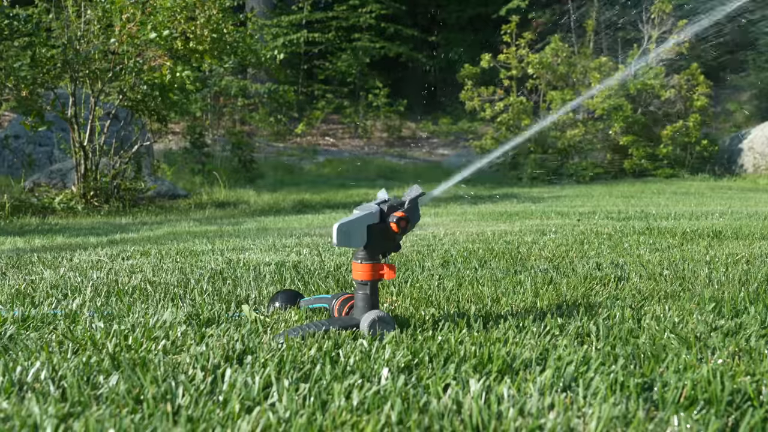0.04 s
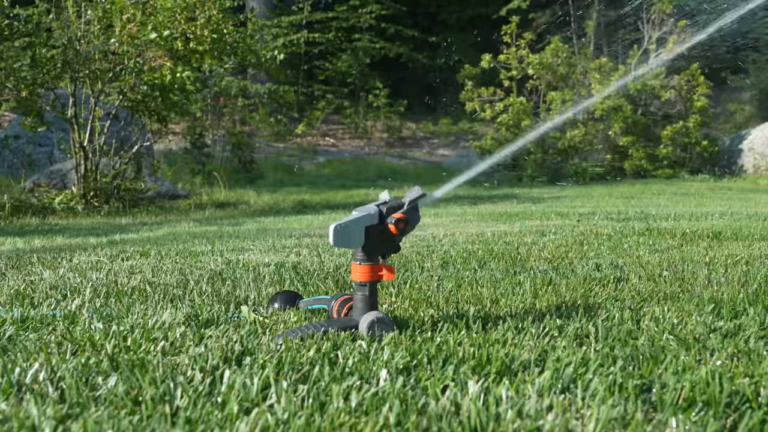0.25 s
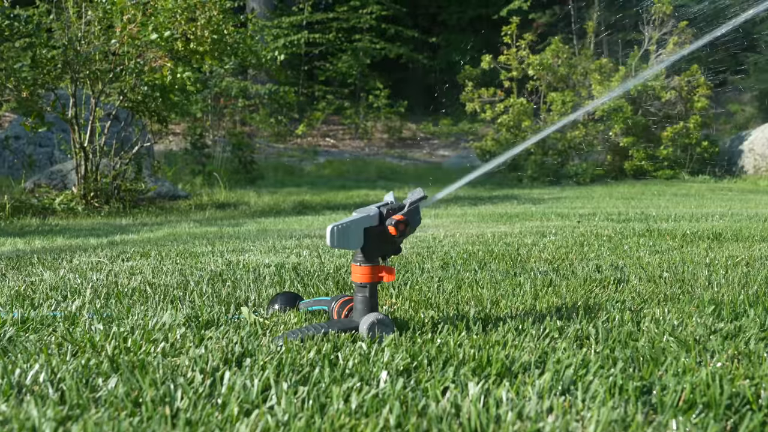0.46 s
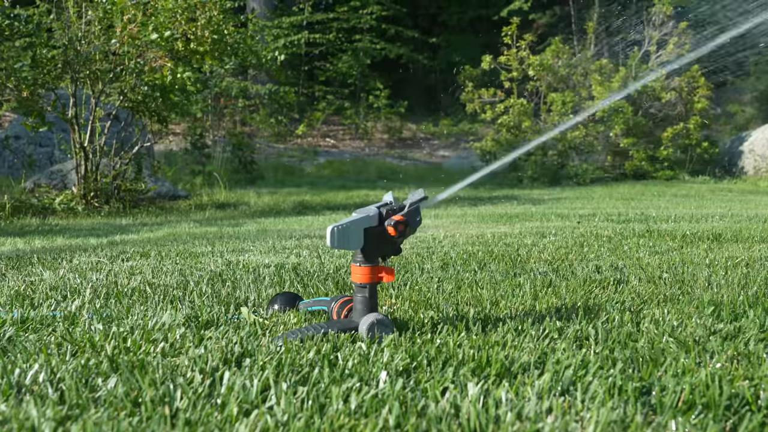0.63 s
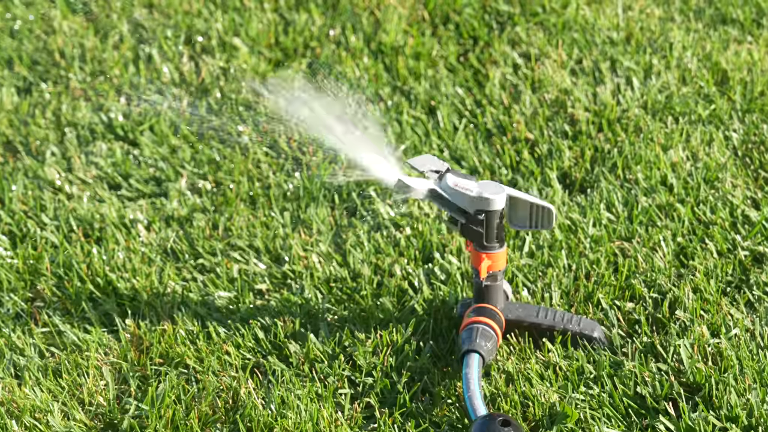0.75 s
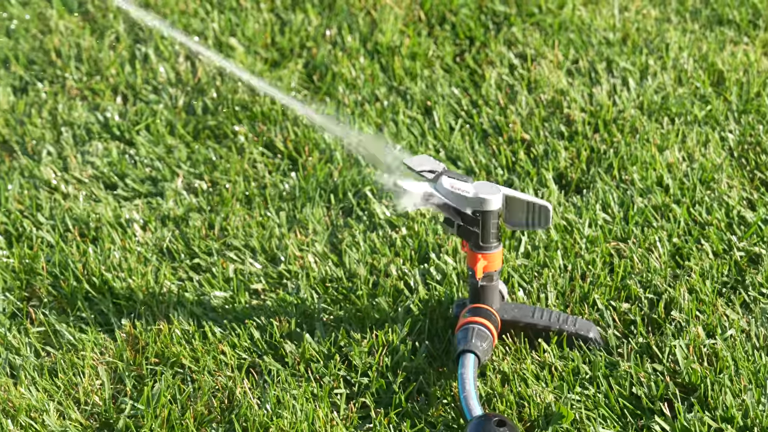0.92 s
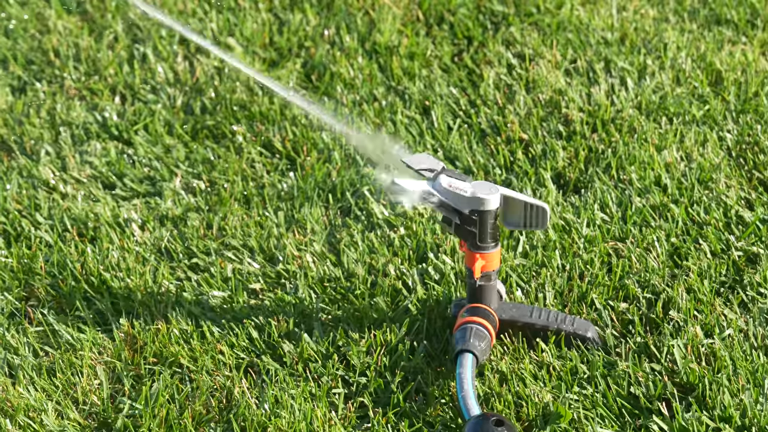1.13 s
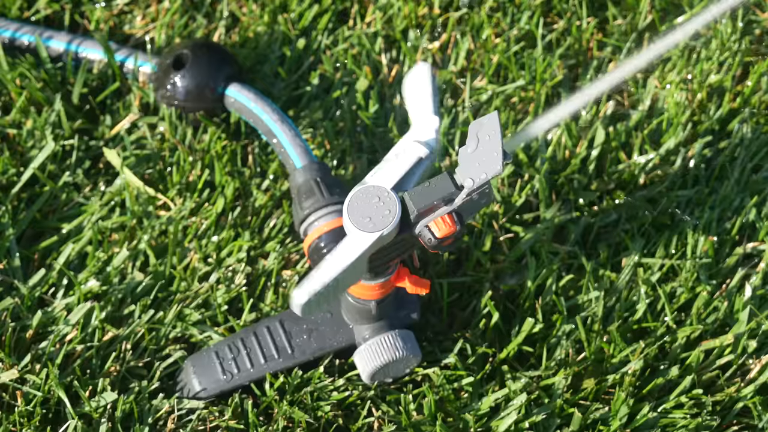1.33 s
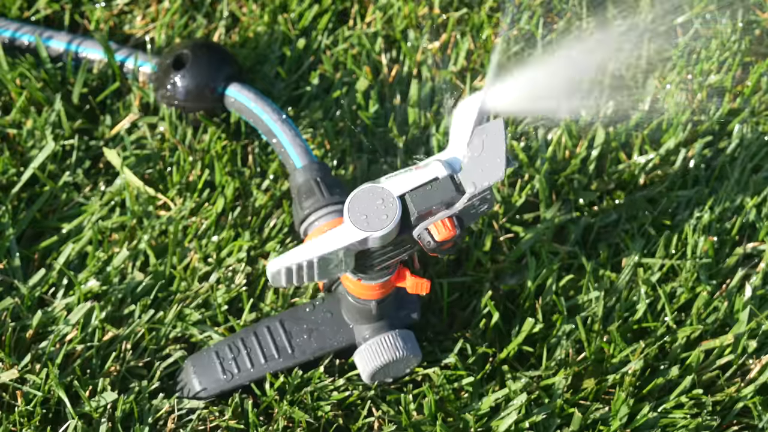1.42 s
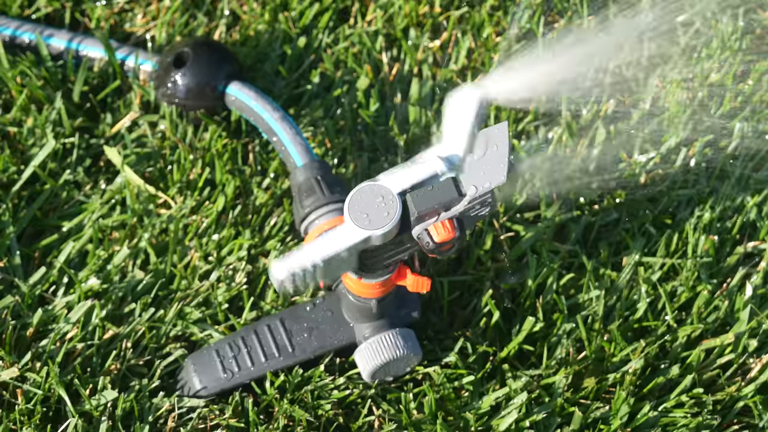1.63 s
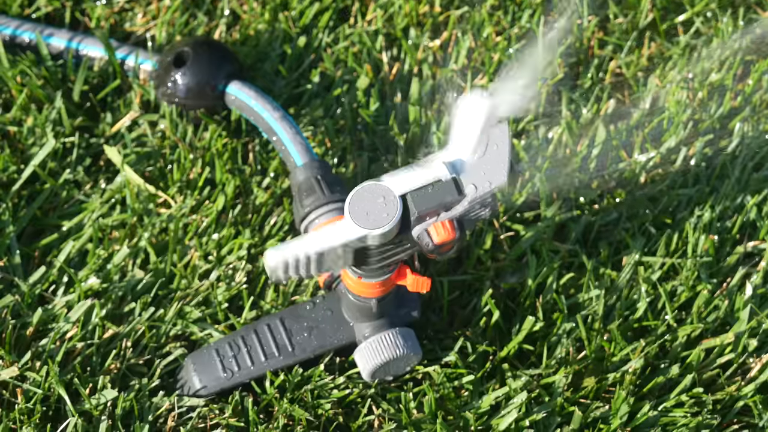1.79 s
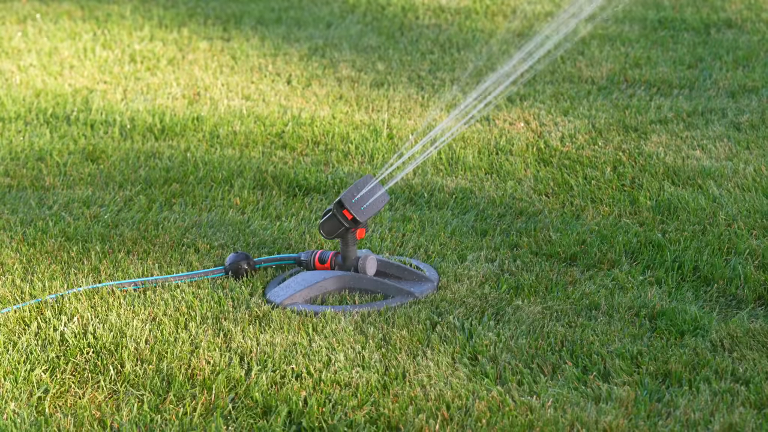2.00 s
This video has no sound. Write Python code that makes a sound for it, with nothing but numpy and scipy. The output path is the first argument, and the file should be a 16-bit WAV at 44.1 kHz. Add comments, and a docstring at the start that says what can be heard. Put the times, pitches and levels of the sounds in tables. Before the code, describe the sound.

A lawn sprinkler pulses outdoors with sharp, regular ticks and short splashes of spray.

```python
"""A nozzle hisses over a distant rumble: an impact sprinkler on a lawn.
Five times a second its sprung arm swings into the jet: water rings in the scoop, the arm knocks on
the head, and the jet shatters into spray until the arm swings clear. Faint whistles fall between strokes.
Heard from three nearby positions in turn, then briefly from a fourth."""
import sys
import numpy as np
from scipy.fft import rfft, irfft, next_fast_len
from scipy.io import wavfile
from scipy.ndimage import map_coordinates

SR = 44100
rng = np.random.default_rng(int(sys.argv[2]) if len(sys.argv) > 2 else 0)


def wrap_up_sound(samples):
    """Save the sound to the file named by the first command line argument, as 16-bit audio."""
    columns = np.atleast_2d(samples).T
    # keep every value between -1 and 1, then stretch to whole-number steps
    tamed = np.clip(columns, -1, 1)
    steps = np.round(tamed * 32767).astype(np.int16)
    wavfile.write(sys.argv[1], SR, steps)


N = 90537

# changes of listening position (time [s])
MOVES_S = [.705, 1.325, 1.996]
# free jet (frequency [Hz], level [dB])
JET_SPECTRUM = [(1500, -3.5), (2800, -.5), (3800, -4), (5000, 1.5), (7500, -4.5), (9500, -4), (11300, -5),
                (13000, 0), (15500, -3)]
# nozzle resonance, per position (frequency [Hz], half width [Hz], lift [dB])
NOZZLE_PEAKS = [(6400, 320, 10.5), (6160, 180, 7.5), (2280, 130, 6), (4240, 5400, 4)]
# jet, per position (level [dB])
JET_LEVELS_DB = [-49, -52, -49.5, -43]
# distant rumble (frequency [Hz], level [dB])
RUMBLE_SPECTRUM = [(32, -19), (50, -10.5), (80, -1), (115, 1), (150, -2.5), (210, -2.5), (330, -10.5),
                   (550, -10), (900, -20.5), (1500, -22)]
# swell of rumble and hum (time [s], gain [dB])
SWELL = [(.17, 0.5), (.3, 0.5), (1.2, -0.5), (1.28, -1), (1.5, -0.5)]
# open-air rush (frequency [Hz], level [dB])
RUSH_SPECTRUM = [(160, -4.5), (220, 3.5), (400, -3.5), (800, -0.5), (1200, -5), (2000, -29)]
# rush, per position (level [dB])
RUSH_LEVELS_DB = [-62.5, -53, -55.5, -50]
# deeper rumble at the last position (frequency [Hz], level [dB])
DEEP_SPECTRUM = [(25, -5), (55, -11), (90, -1), (200, -24)]
# arm strokes, per position (jet contact [s], knock time [s], length [s], scoop gain [dB],
# scoop ring [Hz], spray gain [dB], knock gain [dB])
ARM_STROKES = [
    [(.143, .162, 0.065, -35, 4660, -27.5, -24), (.337, .356, 0.065, -34, 4560, -27.5, -22.5),
     (.531, .549, 0.063, -32.5, 4530, -26, -22)],
    [(.763, .779, 0.059, -29, 4390, -30.5, -24), (.961, .978, 0.06, -30, 4420, -30, -22.5),
     (1.159, 1.178, 0.062, -31, 4500, -30.5, -22.5)],
    [(1.411, 1.427, 0.054, -30.5, 5170, -25.5, -25.5), (1.622, 1.638, 0.054, -28, 4650, -25, -25),
     (1.831, 1.847, 0.054, -29, 5160, -24.5, -21)],
]
# shattered jet, per position (frequency [Hz], level [dB])
SPRAY_SPECTRA = [
    [(1300, -18.5), (2000, -7), (2300, 3.5), (3500, -7), (4400, 6.5), (5900, -10.5), (7000, 5.5),
     (8000, -2), (10000, 3), (15500, -2)],
    [(1100, -17.5), (1850, -10), (2500, -1), (4500, 9.5), (6300, 6.5), (8300, 0.5), (11000, 7.5),
     (15500, 3)],
    [(1100, -14), (1700, -11), (2200, 0), (2800, -6), (3400, 3.5), (5000, -3.5), (7500, 1), (15500, 2)],
]
# spray envelope, per position (rise [s], sag [dB], tail [dB])
SPRAY_ENVELOPES = [(0.027, 1, -31), (0.014, 3.5, -18.5), (.018, 2.5, -17.5)]
# coarse drops, per position (level re spray [dB])
SPIT_LEVELS_DB = [-18, -6.5, -10]
# head resonances, per position (frequency [Hz], half width [Hz], lift [dB])
HEAD_PEAKS = [
    [(2800, 200, 7), (5120, 56, 10.5), (7260, 50, 4), (13900, 90, 8), (15530, 110, 11)],
    [(1453, 210, 16.5), (2150, 103, 12), (2920, 250, 4.5), (9500, 97, 9)],
    [(3980, 95, 6), (5130, 200, 12.5), (6410, 170, 8), (6860, 110, 9), (7920, 64, 7)],
]
# hollow of the scoop, per position (frequency [Hz], level [dB])
SCOOP_SPECTRA = [
    [(2000, -13), (3600, -12), (4500, 1), (5300, -1.5), (7500, -17), (15000, -12)],
    [(3700, -20), (4300, 2.5), (6300, 3.5), (7500, -12.5), (11000, -9.5), (15000, -22)],
    [(3600, -21), (4300, 5.5), (6400, -4), (7500, 0), (15000, -21)],
]
# water splats in the scoop and the arm's second clacks (time [s], length [s], frequency [Hz], level [dB])
BRIEF_RINGS = [(0.158, .008, 4550, -31.5), (.201, 0.0064, 2890, -33), (0.366, .008, 4310, -31),
               (0.586, .009, 2326, -30), (0.772, .008, 6300, -32), (.986, 0.0061, 4550, -27),
               (1.181, .006, 4130, -30), (1.423, 0.0051, 5200, -26.5), (1.431, 0.0167, 4176, -25),
               (1.635, 0.0078, 6210, -24.5), (1.642, 0.0084, 4440, -25), (1.667, .008, 3270, -30.5),
               (1.840, .005, 5080, -26.5)]
# knock mode, per position (frequency [Hz], t60 [s])
KNOCK_MODES = [(2380, 0.027), (3085, 0.015), (2306, 0.019)]
# dull slap as the arm leaves the jet (frequency [Hz], level [dB])
SLAP_SPECTRUM = [(1300, -29), (2200, -7.5), (3300, 1), (5000, -10.5)]
# jet whistles (time [s], length [s], start frequency [Hz], level [dB])
WHISTLE_EVENTS = [(1.245, 0.029, 2920, -53.5), (1.745, 0.048, 3370, -54.5), (1.915, 0.018, 3400, -50)]

TIME_S = np.arange(N) / SR


def amp(db):
    """dB to gain."""
    return 10 ** (np.asarray(db) / 20)


def unit(x):
    """x at rms 1."""
    return x / np.sqrt(np.mean(x ** 2) + 1e-20)


def ramp(t, length_s):
    """0 before t = 0, rising to 1 over length_s."""
    return np.clip(t / length_s, 0, 1)


def wobble(knots_per_s):
    """Smooth random curve."""
    return map_coordinates(rng.standard_normal(4096), [TIME_S * knots_per_s], mode="mirror")


def filtered(x, response):
    """x through a gain response(hz)."""
    size = next_fast_len(N + 8192)
    return irfft(rfft(x, size) * response(np.fft.rfftfreq(size, 1 / SR)), size)[:N]


def coloured(x, spectrum, peaks=()):
    """x shaped by a spectrum, 40 dB down an octave past its ends, plus resonances; rms 1."""
    knots_hz, knots_db = np.transpose(spectrum)
    knots_hz = np.r_[knots_hz[0] / 2, knots_hz, knots_hz[-1] * 2]
    knots_db = np.r_[knots_db[0] - 40, knots_db, knots_db[-1] - 40]

    def response(hz):
        peaks_db = sum(lift * np.exp(-((hz - centre) / width) ** 2) for centre, width, lift in peaks)
        return amp(np.interp(np.log(hz + 1), np.log(knots_hz + 1), knots_db) + peaks_db)
    return unit(filtered(x, response))


def noise(spectrum, peaks=()):
    """Coloured Gaussian noise; rms 1."""
    return coloured(rng.standard_normal(N), spectrum, peaks)


def positions(fade_s=.004):
    """One 0-1 gate per listening position."""
    moves = [ramp(TIME_S - move_s, fade_s) for move_s in MOVES_S]
    return -np.diff([np.ones(N)] + moves + [np.zeros(N)], axis=0)


def jet():
    """The nozzle's steady, faintly pitched hiss."""
    return sum(gate * amp(db) * noise(JET_SPECTRUM, [peak])
               for gate, db, peak in zip(positions(), JET_LEVELS_DB, NOZZLE_PEAKS))


def garden(rumble_db=-50, hum_hz=116.6, hum_db=-57, drift_rad=0.35, deep_db=-48.5):
    """Distant rumble, a far unsteady hum and the rush of open air."""
    gates = positions()
    hum = np.sin(2 * np.pi * hum_hz * TIME_S + drift_rad * wobble(10.94)) * amp(2.6 * wobble(8.5))
    rush = amp(RUSH_LEVELS_DB) @ gates * noise(RUSH_SPECTRUM)
    rumble = amp(rumble_db) * noise(RUMBLE_SPECTRUM)
    deep = amp(deep_db) * gates[-1] * noise(DEEP_SPECTRUM)
    swell = amp(np.interp(TIME_S, *np.transpose(SWELL)))
    return swell * (rumble + amp(hum_db) * unit(hum)) + rush + deep


def drops(per_s):
    """Random impacts of uneven size; rms 1."""
    return unit((rng.random(N) < per_s / SR) * rng.uniform(-0.81, 1, N))


def water(spectrum, peaks=(), drop_share=0.41, flutter_db=3):
    """Fluttering hiss and a dense rattle of droplets; rms 1."""
    burst = np.sqrt(drop_share) * drops(per_s=9000) + np.sqrt(1 - drop_share) * rng.standard_normal(N)
    flutter = amp(flutter_db * np.tanh(wobble(knots_per_s=350)))
    return coloured(burst * flutter, spectrum, peaks)


def arm(detune_share=.004):
    """Every stroke through the jet; water on the head detunes it each time."""
    out = np.zeros(N)
    for position, strokes in enumerate(ARM_STROKES):
        for start_s, knock_s, length_s, scoop_db, ring_hz, spray_db, knock_db in strokes:
            t, since_knock_s = TIME_S - start_s, TIME_S - knock_s
            head = [(hz * (1 + detune_share * rng.uniform(-0.86, 1)), width_hz, db)
                    for hz, width_hz, db in HEAD_PEAKS[position]]
            shatter = spray(since_knock_s, start_s + length_s - knock_s, position, head)
            out += amp(spray_db) * spray_envelope(t, length_s, *SPRAY_ENVELOPES[position]) * shatter
            out += amp(scoop_db) * scoop(t, length_s, SCOOP_SPECTRA[position], ring_hz)
            out += amp(spray_db) * slap(t - length_s, head)
            out += amp(knock_db) * knock(since_knock_s, *KNOCK_MODES[position])
    return out


def spray(since_knock_s, stay_s, position, head, coarse_hz=3930, early_db=-2.5, sag_db=1.5):
    """The jet shatters; its low band is coarse water, which needs the arm deep in the jet."""
    spectrum = SPRAY_SPECTRA[position]
    shatter = water(spectrum, head)
    shatter += amp(SPIT_LEVELS_DB[position]) * coloured(drops(per_s=500), spectrum, head)
    coarse = filtered(shatter, lambda hz: 1 / (1 + (hz / coarse_hz) ** 16))
    early = 1 - ramp(since_knock_s + 0.0029, .002)
    resting = np.sin(np.pi * ramp(since_knock_s, stay_s - .012))
    return shatter - coarse + coarse * amp(early_db * early - sag_db * resting)


def spray_envelope(t, length_s, rise_s, sag_db, tail_db, start_db=-17, lead_s=.003,
                   release_db_per_s=964, tail_db_per_s=260):
    """Spray builds, sags as the arm rests, flares as it leaves; mist trails after."""
    after_s = np.maximum(t - length_s, 0)
    resting = np.sin(np.pi * ramp(t - rise_s, length_s - rise_s - .008)) ** 2
    db = start_db * (1 - ramp(t, rise_s)) - sag_db * resting
    release = np.hypot(amp(-release_db_per_s * after_s), amp(tail_db - tail_db_per_s * after_s))
    return ramp(t + lead_s, 0.0036) * amp(db) * release


def scoop(t, length_s, spectrum, ring_hz, half_width_hz=180, lift_db=10, graze_s=0.01115, graze_db=-5,
          hold_s=0.026, fall_db_per_s=365, release_db_per_s=1500):
    """The scoop grazes the jet, fills and rings, then empties."""
    filled = ramp(t - graze_s, 0.0017)
    graze = amp(graze_db) * ramp(t, 0.003) * (1 - filled) * water(spectrum)
    ring = water(spectrum, [(ring_hz, half_width_hz, lift_db)])
    fall_db = fall_db_per_s * np.maximum(t - hold_s, 0) + release_db_per_s * np.maximum(t - length_s, 0)
    return graze + filled * amp(-fall_db) * ring


def splats_and_clacks(roughness=0.51, fall_hz_per_s=8000):
    """Brief, rough rings during a stroke: water splats in the scoop and the arm's second clacks."""
    out = np.zeros(N)
    for start_s, length_s, hz, db in BRIEF_RINGS:
        t = TIME_S - start_s
        phase = 2 * np.pi * np.cumsum(hz - fall_hz_per_s * (t - length_s / 2)) / SR
        ring = np.sin(phase) + roughness * (wobble(900) * np.sin(phase) + wobble(900) * np.cos(phase))
        envelope = np.sqrt(np.abs(np.sin(np.pi * ramp(t, length_s))))
        out += amp(db) * envelope * unit(ring)
    return out


def knock(t, hz, t60_s, crack_db=-9, crack_t60_s=.008):
    """The plastic arm strikes the head: a short crack and one damped mode."""
    t = np.maximum(t, 0)
    ring = np.sin(2 * np.pi * hz * (1 + rng.normal(0, 0.0096)) * t) * amp(-60 * t / t60_s)
    crack = rng.standard_normal(N) * amp(crack_db - 60 * t / crack_t60_s)
    return ramp(t, 0.00054) * (ring + np.diff(crack, prepend=0) / 2)


def slap(since_end_s, head, re_spray_db=-9.5, lead_s=0.0036, half_width_s=0.0072):
    """Dull slap of water as the arm leaves the jet."""
    envelope = np.exp(-((since_end_s + lead_s) / half_width_s) ** 2)
    return amp(re_spray_db) * envelope * water(SLAP_SPECTRUM, head)


def whistles(fall_hz_per_s=2200, waver_hz=40):
    """Brief falling whistles of the jet between strokes."""
    out = np.zeros(N)
    for start_s, length_s, hz, db in WHISTLE_EVENTS:
        t = TIME_S - start_s
        pitch_hz = hz - fall_hz_per_s * t + waver_hz * wobble(300)
        envelope = np.sin(np.pi * ramp(t, length_s))
        out += amp(db) * envelope * np.sin(2 * np.pi * np.cumsum(pitch_hz) / SR)
    return out


def scene():
    """The sprinkler on its lawn."""
    return (arm() + splats_and_clacks() + jet() + whistles() + garden())[None]


def record(dry, start_s=0.033, top_hz=15900):
    """Fast fade-in and band limit."""
    opened = dry[0] * ramp(TIME_S - start_s, 0.0011)
    return filtered(opened, lambda hz: hz < top_hz)[None]


dry = scene()
out = record(dry)
wrap_up_sound(out)
```